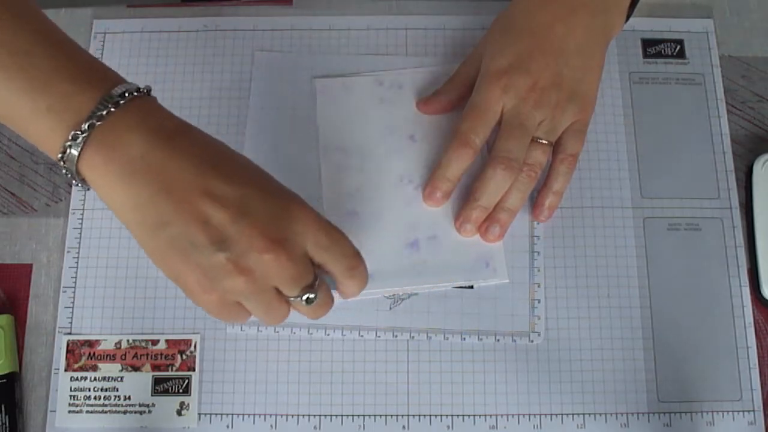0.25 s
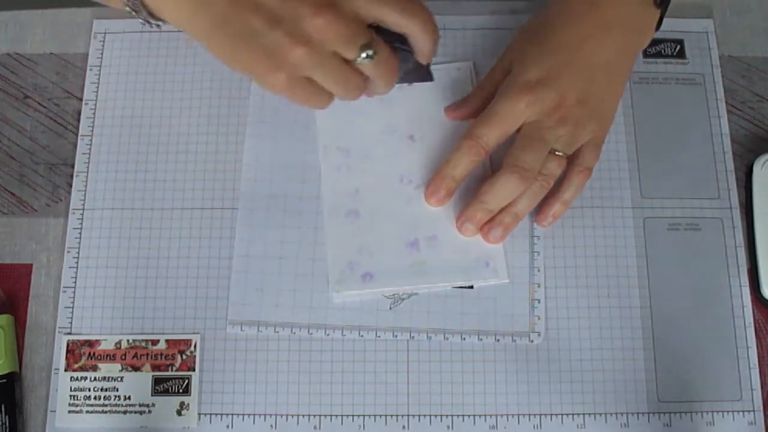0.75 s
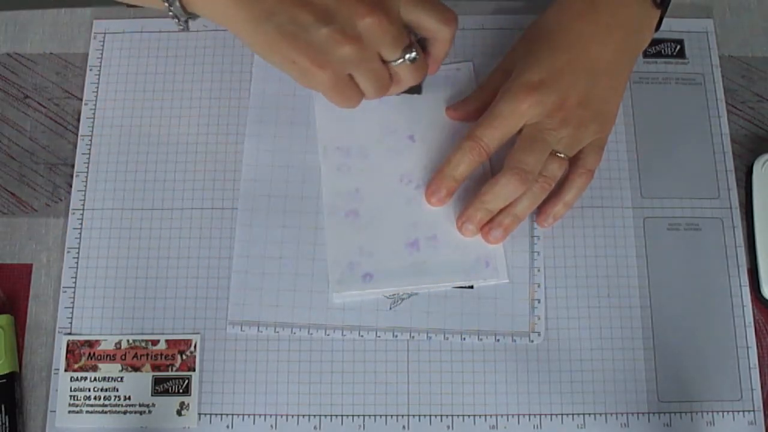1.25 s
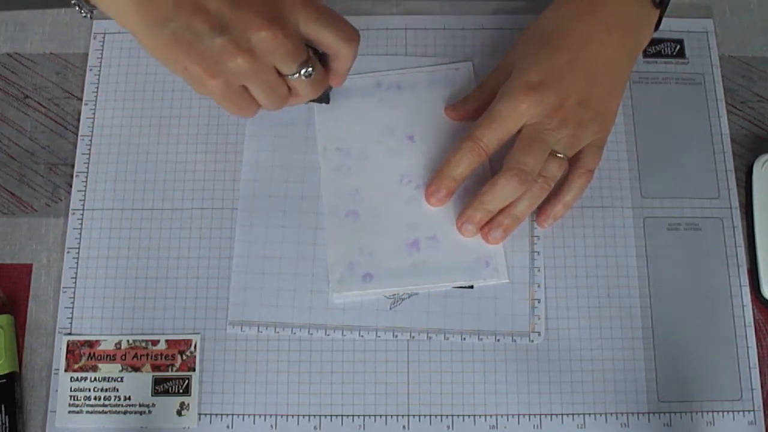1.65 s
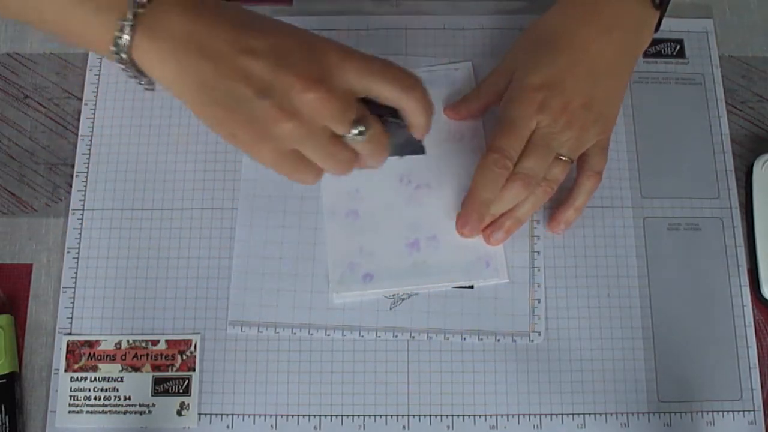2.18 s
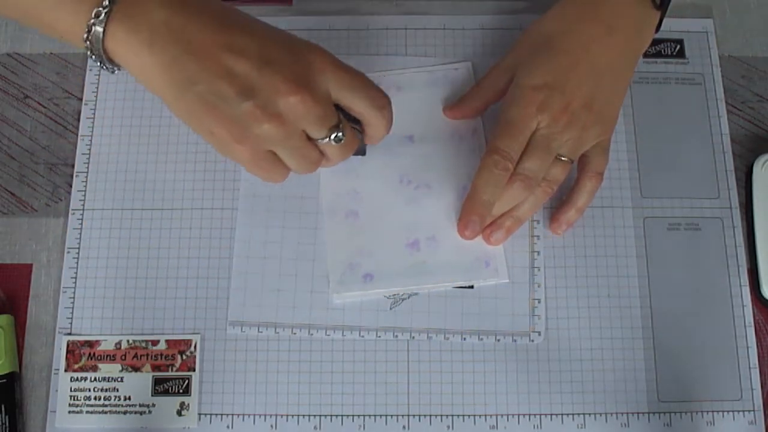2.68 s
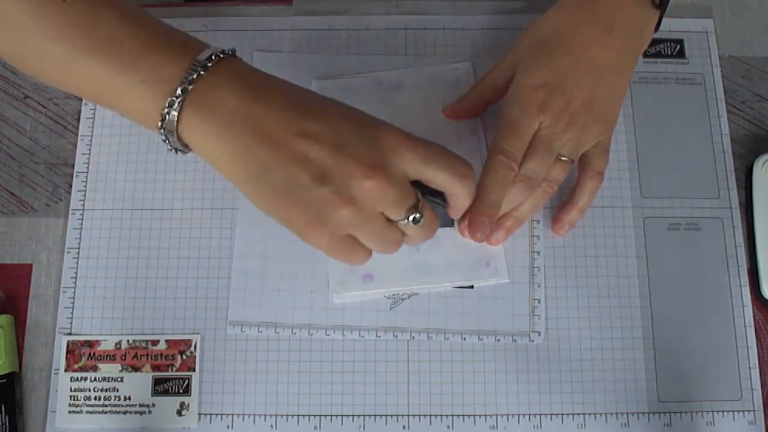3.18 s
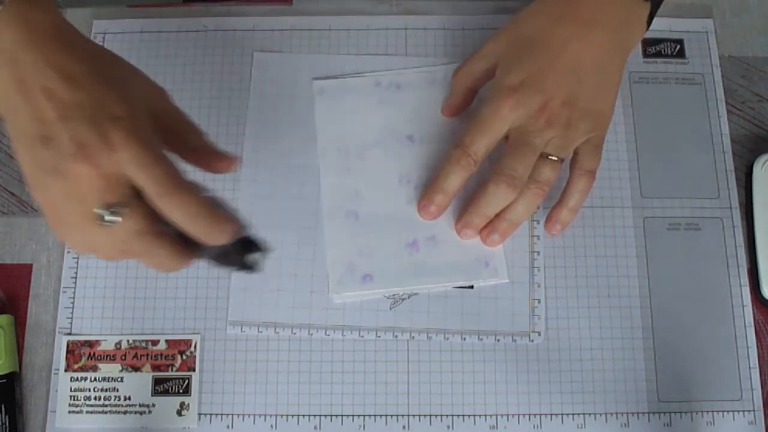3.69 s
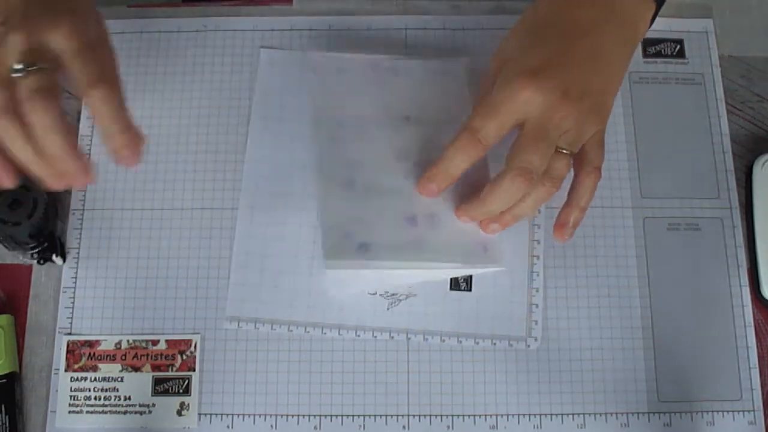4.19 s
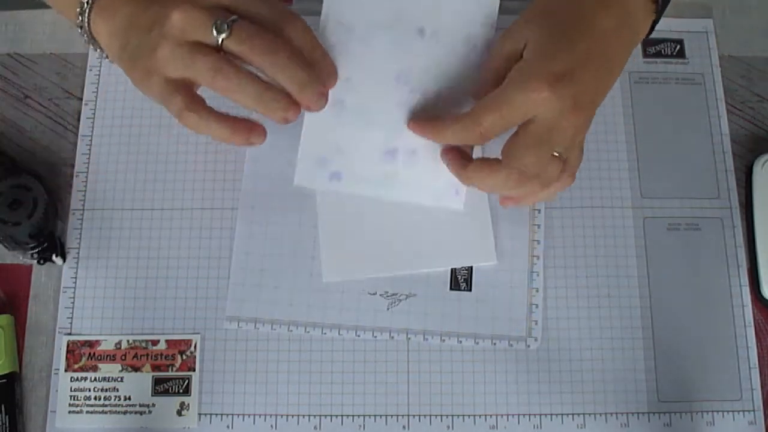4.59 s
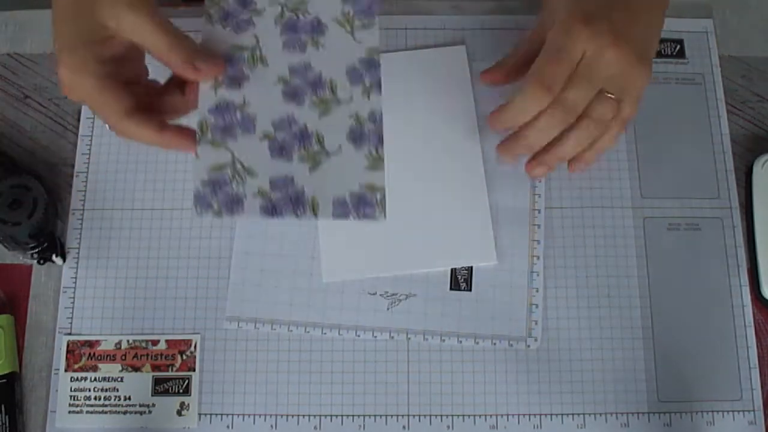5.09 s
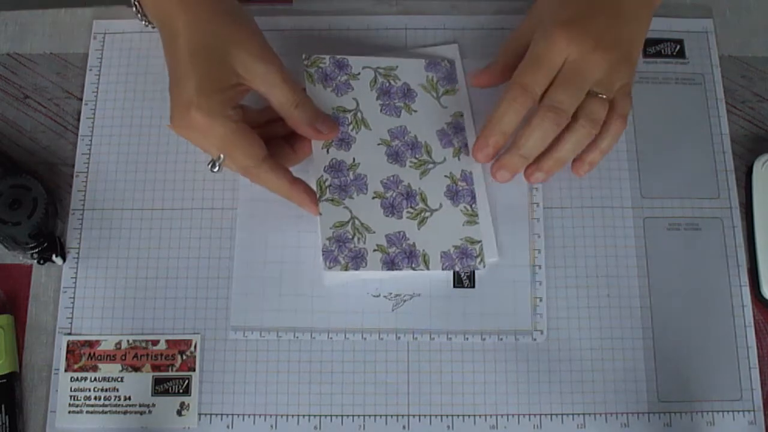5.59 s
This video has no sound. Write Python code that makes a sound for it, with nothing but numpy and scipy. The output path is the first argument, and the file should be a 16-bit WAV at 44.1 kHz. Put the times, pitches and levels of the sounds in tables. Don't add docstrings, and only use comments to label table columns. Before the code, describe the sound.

At a craft table, a nearby microphone picks up four coarse plastic ratcheting strokes, the first already under way. Hands brush the card and the tool taps lightly in the gaps. After the fourth stroke it is set down sharply, knocking, buzzing and bouncing on wood, then sliding briefly. A sheet is lifted and turned with faint rustles and small snaps, leaving quiet hiss with a barely audible fast ticking.

```python
import sys
import numpy as np
from scipy import signal
from scipy.fft import rfft, irfft, next_fast_len
from scipy.io import wavfile
from scipy.ndimage import uniform_filter1d

SR = 44100
rng = np.random.default_rng(int(sys.argv[2]) if len(sys.argv) > 2 else 0)


def volts_from_db(level):
    exponent = np.asarray(level, float) / 20
    return 10 ** exponent


def wav_record(signal):
    frames = np.transpose(np.atleast_2d(signal))
    bounded = np.clip(frames, -1, 1)
    quanta = np.round(bounded * 32767).astype(np.int16)
    wavfile.write(sys.argv[1], SR, quanta)


N = 257959

# f/Hz, level/dB [per Hz]
HISS_SPECTRUM = [(12, -48), (20, -8.5), (75, -8.5), (144, -1), (301, 4.5), (699, 2.5), (757, 2.5), (934, 0),
                 (2110, -3), (2290, -3.5), (4910, -8.5), (7880, -10), (10800, -12.5), (14100, -50),
                 (22000, -120)]
HISS_DB = -54
FRAME_HZ, FRAME_S = 30, .0198
BANDWIDTH_HZ = 11020
# f/Hz, T60/s
ROOM_T60 = [(100, 0.32), (500, 0.28), (2000, 0.34), (5000, 0.32), (8000, 0.33), (11000, 0.32)]
# f/Hz, level/dB
ROOM_COLOUR = [(500, 4), (1500, -1), (3000, 1), (5500, 0), (9000, -2.5)]
LEAD_S = .2
WALL_RING, TAP_WALL_RING = .5, .28

SWELL_DB = 25
# t/s [peak], rise/s, fall/s, rub level/dB, rustle level/dB
HAND_RUBS = [(.42, 0.077, 0.33, -38, -38), (1.01, .012, 0.13, -44.5, -38), (1.068, 0.12, 0.064, -38, -58),
             (1.175, 0.08, 0.012, -37, -42), (2.11, .12, 0.45, -55, -73), (2.375, 0.037, 0.1, -34, -47),
             (2.843, 0.039, 0.03, -35.5, -38), (3.182, 0.05, 0.2, -41, -70), (3.255, .22, .015, -64, -64),
             (3.62, 0.056, 0.078, -44, -44), (3.94, 0.29, .015, -63, -46)]
# t/s [peak], rise/s, fall/s, rub level/dB, rustle level/dB
PAPER_TURNS = [(4.24, .02, 0.27, -40, -47), (4.487, 0.021, 0.13, -43, -49), (4.71, 0.17, .05, -50, -49),
               (4.79, 0.037, 0.018, -40, -42.5), (4.823, 0.019, 0.096, -36, -41),
               (5.072, 0.18, 0.15, -47, -45.5), (5.22, 0.0084, 0.009, -70, -47), (5.3, .1, .18, -56, -70),
               (5.452, .025, 0.35, -64, -49), (5.67, 0.56, 0.15, -55, -56), (5.758, 0.019, .15, -55, -55)]
# t/s [peak], rise/s, fall/s, level/dB, f/Hz [at peak], sag/(Hz/s^2)
ROLLER_SQUEAKS = [
    (.505, .09, .05, -61, 5290, 40000),
    (.582, .06, .035, -56, 4860, 200000),
    (.578, .05, .03, -59, 2430, 100000),
    (.21, .05, .05, -49, 470, 0),
]
# t/s [peak], rise/s, fall/s, level/dB
SWEEP_1 = (.52, .16, .22, -53)
SWEEP_4 = (3.74, .12, .2, -53)
# f/Hz, width/Hz, level/dB
WHINE_1 = [(2420, 240, 3), (5050, 260, 1), (6750, 200, -14), (9000, 136, -9)]
WHINE_4 = [(1910, 200, 3), (3070, 300, -2), (5210, 100, -14)]
# t/s [peak], rise/s, fall/s, level/dB
SLIDE = (4.145, .06, .17, -36)
# f/Hz, width/Hz, level/dB
SKID_MODES = [(1890, 90, 10.5), (2780, 250, -1), (3100, 200, -6), (4010, 130, -2), (4950, 66, 10),
              (7200, 250, -6.5), (10000, 200, -13)]

# f/Hz, level/dB, T60/s
TABLE_MODES = [(122.8, -1, 0.4), (164, -18, 0.1), (204, -3, 0.12), (254, -11, 0.15), (310.5, -4, 0.15),
               (396, 5.5, 0.051), (469, 1, 0.08), (651, -5, 0.12), (856, 6, 0.069), (1330, -16, 0.06)]
# t/s, peak level/dB, f/Hz [of the push]
THUDS = [
    (3.9705, -12.5, 400),
    (4.0427, -14, 420),
    (3.997, -30, 330),
    (4.014, -24, 470),
    (4.0245, -25, 470),
    (4.0665, -25, 430),
    (4.255, -29, 720),
    (4.263, -38, 300),
]
# t/s [peak], rise/s, fall/s, peak level/dB
LIP_CHATTER = (3.969, .0125, .066, -15)
# multiple of slip rate, level/dB
SLIP_ORDERS = [(1, -7), (2, 0), (3, -8), (4, -10), (5, -20)]
CHATTER_HZ, CHATTER_S, LAG_HZ, SETTLE_S = 461, 3.9655, 27, .012

# t/s, peak level/dB,
# ring f/Hz, table thud level/dB, burst/ms
TAPS = [(0.338, -40, 500, -40, 4), (0.5235, -42, 5150, -55, 3.2), (0.597, -35.5, 2640, -66, 3.6),
        (0.5985, -41, 4300, -70, 3), (0.66, -39, 2970, -68, 4.3), (0.807, -36, 2540, -58, 7.8),
        (1.006, -34, 2710, -70, 3.4), (1.0152, -33, 2720, -64, 5.1), (1.0212, -30.5, 3100, -57, 7.5),
        (1.035, -28, 2600, -49, 3.1), (1.128, -30, 2700, -66, 1.7), (1.1326, -28.5, 1760, -65, 3.4),
        (1.885, -41, 4300, -70, 2.3), (1.9319, -26, 7000, -60, 3.4), (1.9763, -45, 4200, -61, 1.2),
        (2.1906, -45, 1690, -56, 5), (2.2942, -33.5, 2770, -60, 1.8), (2.363, -27.5, 2930, -28, 3.5),
        (2.409, -48, 5200, -45, 2.4), (2.8363, -33, 2140, -63, 2.3), (2.9838, -42.5, 2040, -56, 2.6),
        (3.132, -35, 1500, -36, 4), (3.134, -36, 2100, -60, 3), (3.1555, -25.5, 1500, -52, 2.2),
        (3.2166, -38, 1660, -68, 3.4), (3.228, -41, 1720, -57, 2.3),
        (3.562, -42, 500, -42, 4), (3.592, -36, 1400, -50, 3), (3.704, -37.5, 1910, -64, 2.5),
          (3.7218, -37, 1900, -66, 5.3), (3.78, -34, 3030, -66, 2.7), (3.8406, -36.5, 9100, -67, 1.8),
          (3.8717, -49, 7550, -63, 2.5), (3.92, -44, 4500, -55, 3.2), (3.9675, -22, 7400, -60, 7),
          (3.9682, -19.5, 1430, -51, 7.6), (4.0445, -29, 2750, -30, 3.9), (4.057, -30, 1420, -60, 6),
          (4.053, -24, 3000, -34, 2.5), (4.1022, -27, 3950, -52, 1.4), (4.1273, -34, 4920, -60, 2.4),
          (4.1868, -39, 1900, -62, 3.6), (4.2525, -39, 720, -43, 3), (4.691, -46, 1210, -60, 2.5),
          (4.7813, -48, 1640, -48.5, 3.7), (4.819, -42, 1040, -65, 2.6), (4.8326, -38, 1300, -56, 4.8),
          (4.869, -41.5, 6400, -46, 4.5), (5.2196, -39, 5600, -62, 1.3), (5.444, -36.5, 6500, -55, 6.3),
          (5.509, -46, 9500, -63, 3)]
# f/Hz, level/dB [per Hz]
TAP_SPECTRUM = [(300, -30), (1000, -2), (2500, -0.5), (5000, -5), (10800, -14.5)]
TAP_REACH, DULL_HZ = 2.6, 2200

# f/Hz, level/dB [per Hz]
CRACK_SPECTRUM = [(100, -28), (450, -9), (850, -6), (1300, -10), (2100, -11.5), (2850, 4), (3400, -3),
                  (4700, -6.5), (6400, -1.5), (8000, -6), (10800, -10), (14000, -64)]
# f/Hz, width/Hz, level/dB
GRIP_1 = [(1320, 150, 5), (1520, 220, 11), (2350, 380, 4), (2930, 200, -2), (3790, 400, 1), (4500, 200, -5),
          (5600, 830, -4.5)]
GRIP_2 = [(1460, 170, 5), (1790, 250, 7), (2260, 140, 4.5), (2620, 120, 0), (4720, 2200, -1),
          (6360, 280, -9), (10000, 650, -13)]
GRIP_3 = [(1730, 230, -1), (2270, 250, -3), (2770, 57, -14), (4200, 120, 0), (4580, 92, -4),
          (4950, 240, -1), (10200, 770, -26)]
GRIP_4 = [(1550, 670, 11), (2000, 150, -19), (2770, 78, 6), (4220, 1300, 1.5), (4860, 210, 1),
          (6230, 250, 6.5), (9800, 400, -20)]
# t/s, level/dB, brightness/dB, low ring f/Hz, high ring f/Hz
TEETH_1 = [(0.0062, -21, -1, 1590, 4300), (0.0185, -22.5, -5, 1530, 4370), (0.0271, -20.0, -1, 1580, 4270),
           (0.0389, -20, 0, 1490, 5400), (0.0466, -20, -2.5, 1590, 5600), (0.0605, -21.0, -1, 1540, 4340),
           (0.07, -23, 7, 1660, 3940), (0.084, -23, -2, 1600, 6040), (0.0967, -22.5, -7, 1320, 3820),
           (0.1093, -22.5, 0, 1670, 4520), (0.1249, -21, 1, 1530, 4700), (0.1404, -23.5, 1, 1480, 3800),
           (0.154, -20, 8.5, 1600, 3900), (0.1677, -18.5, -5, 1520, 3870),
           (0.1848, -20.5, -7.5, 1450, 3660), (0.206, -19.5, -7.0, 1510, 4440),
           (0.2233, -21, 4, 1550, 3970), (0.2453, -21.5, -1, 1360, 3820)]
TEETH_2 = [(1.1886, -20.5, 1, 1400, 4840), (1.2073, -19, -5, 1880, 6200), (1.2227, -20.5, 1, 2600, 6900),
           (1.2319, -26, -2, 2490, 6100), (1.2436, -22.5, -5, 1380, 3800), (1.2511, -25, 4, 1790, 4910),
           (1.2626, -22.5, 1.5, 1740, 6600), (1.273, -25.5, 1.5, 1870, 4810),
           (1.2829, -22.5, 1, 1830, 4830), (1.296, -25, 11, 2350, 4380), (1.3045, -20, 0, 1720, 4650),
           (1.314, -22.5, 1, 2350, 4250), (1.3251, -20, 1, 2450, 4710), (1.3343, -24.5, 3, 2900, 6360),
           (1.3465, -20, 0, 2740, 4790), (1.3569, -22, 4, 1570, 5020), (1.3648, -21, 4, 2330, 5100),
           (1.376, -23.5, -1, 1910, 4410), (1.3853, -22, 7, 2360, 4740), (1.396, -24.5, 2.5, 1660, 4740),
           (1.4079, -19.5, -2, 2500, 4350), (1.4214, -20.5, -1, 2720, 5170), (1.4327, -23, -3, 2800, 4600),
           (1.444, -24.0, 0, 1590, 6570), (1.4557, -18, -1.5, 1670, 4520), (1.4677, -22, -4, 1730, 4580),
           (1.4805, -24.0, 4, 1700, 4650), (1.4935, -27, 5, 1780, 4760), (1.505, -21.5, 1.0, 1580, 4580),
           (1.5176, -21.5, -4, 1730, 5900), (1.5327, -24, 0.5, 1880, 5050), (1.5503, -20.5, -3, 1890, 4700),
           (1.5684, -22, -2.0, 1660, 4730), (1.585, -23, 2.0, 1650, 4340), (1.6064, -23, -3, 1940, 4580)]
TEETH_3 = [(2.4311, -22.5, 3.5, 1770, 5360), (2.445, -22, 2, 1670, 4850), (2.4567, -20, 2, 1960, 5230),
           (2.4694, -23, 5, 2000, 6040), (2.4754, -22.5, 3, 2000, 4230), (2.4847, -24, 12, 2000, 5220),
           (2.4942, -22.5, 5, 1600, 4140), (2.502, -25.5, 4, 2700, 4720), (2.5106, -22.5, 4, 1550, 5400),
           (2.5181, -23, 3, 2970, 6200), (2.5242, -22.5, 9, 2730, 4100), (2.5317, -22.0, 0, 1720, 4200),
           (2.5407, -23.5, 2, 2780, 3950), (2.5498, -22.5, 2, 1560, 5170), (2.5572, -21, -1, 1570, 3950),
           (2.565, -25.5, 6, 1790, 4530), (2.573, -22, -2, 1640, 4870), (2.5829, -21, 2, 1550, 4500),
           (2.593, -21, -7, 1790, 5160), (2.6002, -20, -1, 1820, 5200), (2.6108, -25, -6, 1740, 4400),
           (2.62, -20.5, -4, 1570, 4600), (2.6322, -23, -5, 1840, 6060)]
TEETH_4 = [(3.27, -20.5, -4, 1730, 3960), (3.2906, -20.5, -4.0, 1970, 3750), (3.3074, -23.5, 1, 2070, 3430),
           (3.3174, -22, -0.5, 2100, 6000), (3.3258, -25.5, 8.0, 2790, 5100),
           (3.3336, -22.5, 5, 1890, 6000), (3.3435, -24.5, 5, 1530, 6050), (3.3527, -24, 13, 2700, 6160),
           (3.362, -21.5, 0, 1660, 6300), (3.37, -24.5, 4, 2680, 6400), (3.3762, -26, 1.5, 2240, 4650),
           (3.385, -20, -5, 1460, 4600), (3.3927, -22, 1, 1510, 4600), (3.401, -20, -2, 2100, 3960),
           (3.4077, -21, -2, 1700, 5100), (3.4185, -26.5, 3, 1510, 4840), (3.4262, -23.0, 4, 1670, 5030),
           (3.436, -22.5, 4, 1830, 4970), (3.4454, -24, 5, 2840, 5000), (3.4561, -20.5, -3.5, 1890, 4030),
           (3.4696, -21.0, -2, 1670, 6310), (3.4812, -23.5, -1, 2000, 5800), (3.4935, -25, 7.5, 1870, 4620),
           (3.5054, -19, -2, 2030, 5600), (3.5262, -22.5, -0.5, 1910, 5800)]
# t/s, level/dB, brightness/dB, low ring f/Hz, high ring f/Hz
TEAR_1 = [(.325, -21, -1, 1610, 3830), (.339, -23, -3, 1910, 4350), (0.35, -24, 0, 1650, 5600),
          (0.353, -26.5, -3, 1550, 2860)]
TEAR_2 = [(1.663, -21, -3.5, 1930, 5870), (1.674, -40, -8, 1780, 4240), (1.691, -22, -2, 1800, 4600),
          (1.7874, -23.5, 2, 1880, 4300), (1.941, -22, 3, 1870, 8000)]
TEAR_3 = [(2.716, -20.5, -1, 1750, 4500), (2.729, -32, -2.3, 2000, 4300)]
# level/dB of the card below the case, level/dB of the low ring
VOICING = [
    (-11, 5),
    (-10.5, -5.5),
    (-6.5, -4),
    (-8, -2),
]
TOOTH_RISE_S, TOOTH_FALL_S, TOOTH_LEAD_S = .0017, .003, .0008
CASE_CUT_HZ, SPLIT_HZ = 1050, 3100
HIGH_RING_DB = -7.5


def rms_one(x):
    return x / np.sqrt(np.mean(x ** 2) + 1e-20)


def at_hz(points, hz):
    points = np.array(points)
    return np.interp(np.log(hz + 1), np.log(points[:, 0]), points[:, 1])


def colour(x, spectrum):
    size = next_fast_len(len(x) + 4096)
    gain = rms_one(volts_from_db(at_hz(spectrum, np.fft.rfftfreq(size, 1 / SR))))
    return irfft(rfft(x, size) * gain, size)[:len(x)]


def resonate(x, hz, width_hz):
    r = np.exp(-np.pi * width_hz / SR)
    zeros = np.array([1, 0, -1]) * (1 - r * r) / 2
    return signal.lfilter(zeros, [1, -2 * r * np.cos(2 * np.pi * hz / SR), r * r], x)


def band(x, low_hz, high_hz):
    return signal.sosfilt(signal.butter(2, [low_hz, high_hz], "band", fs=SR, output="sos"), x)


def grit(count, spread_db):
    return rms_one(rng.standard_normal(count) * volts_from_db(spread_db * rng.standard_normal(count)))


def swell(peak_s, rise_s, fall_s, db, bend):
    since = np.arange(N) / SR - peak_s
    return volts_from_db(db - SWELL_DB * (np.abs(since) / np.where(since < 0, rise_s, fall_s)) ** bend)


def add(out, x, s):
    i = round(s * SR)
    x = x[max(-i, 0):N - i]
    out[max(i, 0):max(i, 0) + len(x)] += x


def strike(burst, body, db, wall_ring):
    click = np.zeros(len(burst))
    click[np.argmax(np.abs(burst))] = rng.choice([-1, 1])
    near, far = body(burst, 0.95), body(click, wall_ring)
    near = near * volts_from_db(db) / np.sqrt(np.max(uniform_filter1d(near ** 2, size=150)))
    return near, far * np.sqrt(np.sum(near ** 2) / np.sum(far ** 2))


def microphone_hiss():
    return volts_from_db(HISS_DB) * rms_one(colour(rng.standard_normal(N), HISS_SPECTRUM))


def frame_tick():
    phase = (np.arange(N) / SR - FRAME_S) * FRAME_HZ % 1
    gate = np.exp(-phase / .07) + .5 * np.exp(-((phase - .5) % 1) / .04)
    return volts_from_db(-55) * gate * rms_one(band(rng.standard_normal(N), 4300, 6500))


def room(x):
    t = np.arange(int(.7 * SR)) / SR
    edges = np.geomspace(80, 16000, num=25)
    noise = rng.standard_normal(len(t))
    tail = 0
    for low, high in zip(edges, edges[1:]):
        tail = tail + band(noise, low, high) * volts_from_db(-60 * t / at_hz(ROOM_T60, np.sqrt(low * high)))
    tail = colour(tail, ROOM_COLOUR) * np.clip((t - .002) / 0.004, 0, 1)
    return signal.fftconvolve(x, tail / np.sqrt(np.sum(tail ** 2)))[:len(x)]


def rustle():
    gestures = HAND_RUBS + PAPER_TURNS
    low = sum(swell(s, rise, fall, db, bend=0.95) for s, rise, fall, db, _ in gestures)
    crisp = sum(swell(s, rise, fall, db, bend=0.85) for s, rise, fall, _, db in gestures)
    rub = band(grit(N, spread_db=3), 600, 1900)
    crackle = band(grit(N, spread_db=4), 2600, 9500)
    return low * rms_one(rub) + crisp * rms_one(crackle)


def squeaks():
    t = np.arange(N) / SR
    flutter = 1 + .6 * rms_one(band(rng.standard_normal(N), 20, 90))
    whistles = 0
    for s, rise, fall, db, hz, sag in ROLLER_SQUEAKS:
        phase = 2 * np.pi * (hz * t - sag * (t - s) ** 3 / 3)
        whistles = whistles + swell(s, rise, fall, db + 3, bend=2) * np.sin(phase)
    return flutter * whistles


def skid(stroke, modes, broad_db, glide):
    rub = grit(N, spread_db=3)
    rings = sum(volts_from_db(db) * resonate(rub, hz, width) for hz, width, db in modes)
    t = np.arange(N) / SR
    rings = np.interp(t + glide * (t - stroke[0]) ** 2 / 2, t, rings)
    gain = swell(*stroke, bend=2.25)
    sound = gain * (rings + volts_from_db(broad_db) * band(rub, 620, 4100))
    return sound * np.sqrt(np.sum(gain ** 2) / np.sum(sound ** 2))


def rumble(runner):
    pressure = np.sqrt(uniform_filter1d(runner ** 2, size=4000) + 1e-12)
    return volts_from_db(-37) * pressure * rms_one(resonate(rng.standard_normal(N), 122, width_hz=13))


def table(push):
    out = 0
    for hz, db, t60 in TABLE_MODES:
        r, w = volts_from_db(-60 / (t60 * SR)), 2 * np.pi * hz / SR
        out = out + signal.lfilter([0, volts_from_db(db) * np.sin(w)], [1, -2 * r * np.cos(w), r * r], push + 1e-18)
    return out


def landing_thuds():
    out, t = np.zeros(N), np.arange(-300, 300) / SR
    for s, db, hz in THUDS:
        pulse = np.cos(2 * np.pi * hz * t) * np.exp(-(1.9 * hz * t) ** 2)
        add(out, volts_from_db(db) * pulse, s - 300 / SR)
    return out


def lip_buzz():
    since = np.maximum(np.arange(N) / SR - CHATTER_S, -.05)
    lag = LAG_HZ * SETTLE_S * (np.exp(-since / SETTLE_S) - 1)
    phase = 2 * np.pi * (CHATTER_HZ * since + lag)
    buzz = sum(volts_from_db(db) * np.cos(np.round(k) * phase) for k, db in SLIP_ORDERS)
    wander = rms_one(band(rng.standard_normal(N), 30, 160))
    uneven = volts_from_db(1.5 * wander * np.clip((since - .01) / .02, 0, 1))
    return -swell(*LIP_CHATTER, bend=1.3) * uneven * buzz / np.max(buzz)


def taps():
    near, far, push, t = np.zeros(N), np.zeros(N), np.zeros(N), np.arange(1500) / SR
    for s, db, hz, thud_db, ms in TAPS:
        hit = grit(len(t), spread_db=4.0) * np.exp(-t * 1000 / ms) * np.minimum(t / 0.00099, 1)
        top_hz = TAP_REACH * hz if hz < DULL_HZ else 15000

        def body(v, ring):
            broad = rms_one(band(colour(v, TAP_SPECTRUM), 150, top_hz))
            return broad + ring * volts_from_db(-1.5) * rms_one(resonate(v, hz, width_hz=160))

        direct, click = strike(hit, body, db - 3.5, TAP_WALL_RING)
        add(near, direct, s - .001)
        add(far, click, s - .001)
        add(push, volts_from_db(thud_db - 7) * np.hanning(110), s + .003)
    return near, far, push


def ratchet(teeth, grip, voicing, ring_db, scatter_db):
    near, far, t = np.zeros(N), np.zeros((3, N)), np.arange(-300, 900) / SR
    shape = np.exp(-(np.abs(t) / np.where(t < 0, TOOTH_RISE_S, TOOTH_FALL_S)) ** 2)
    thin = signal.butter(3, CASE_CUT_HZ, "high", fs=SR, output="sos")
    split = signal.butter(4, SPLIT_HZ, fs=SR, output="sos")
    card_db, low_ring_db = voicing
    for n, (s, db, bright_db, low_hz, high_hz) in enumerate(teeth):
        strengths = volts_from_db(ring_db + scatter_db * rng.standard_normal(len(grip)))
        shifts = 1 + .025 * rng.standard_normal(len(grip))

        def case(hit, ring):
            body = colour(hit, CRACK_SPECTRUM)
            for strength, shift, (hz, width, mode_db) in zip(strengths, shifts, grip):
                body = body + strength * volts_from_db(mode_db) * resonate(hit, shift * hz, width)
            body = rms_one(body)
            body = body + ring * volts_from_db(low_ring_db) * rms_one(resonate(hit, low_hz, width_hz=147))
            body = body + ring * volts_from_db(HIGH_RING_DB) * rms_one(resonate(hit, high_hz, width_hz=90))
            low = signal.sosfiltfilt(split, body)
            high = body - low
            upper = signal.sosfiltfilt(thin, low)
            low = upper + volts_from_db(card_db) * (low - upper)
            return low / np.std(band(low, 1100, 2400)) + volts_from_db(bright_db + .5) * rms_one(high)

        direct, click = strike(shape * grit(len(t), spread_db=4.0), case, db, WALL_RING)
        start = s - TOOTH_LEAD_S - 300 / SR
        add(near, direct, start)
        add(far[n % 3], click, start)
    return np.vstack([near, far])


def scene():
    teeth = (TEETH_1 + TEAR_1, TEETH_2 + TEAR_2, TEETH_3 + TEAR_3, TEETH_4)
    strokes = zip(teeth, (GRIP_1, GRIP_2, GRIP_3, GRIP_4), VOICING)
    runner, *feeds = sum(ratchet(*stroke, ring_db=6.5, scatter_db=-4.0) for stroke in strokes)
    tap, tap_feed, push = taps()
    thud, buzz = landing_thuds(), lip_buzz()
    slides = skid(SLIDE, SKID_MODES, broad_db=-5, glide=-0.08) + squeaks()
    slides = slides + skid(SWEEP_1, WHINE_1, broad_db=-19, glide=-0.41)
    slides = slides + skid(SWEEP_4, WHINE_4, broad_db=-14, glide=0)
    wood = volts_from_db(-39.5) * table(push) + volts_from_db(-51.0) * table(thud) + volts_from_db(-47.5) * table(runner)
    lead = round(LEAD_S * SR)
    wet = volts_from_db(-2.5) * sum(room(np.concatenate([feed[:lead][::-1], feed]))[lead:] for feed in feeds)
    wet = wet + room(volts_from_db(-3.5) * tap_feed + volts_from_db(-7.0) * (thud + wood) + volts_from_db(-8.5) * buzz)
    mix = runner + tap + thud + buzz + wood + wet + slides + rumble(runner) + volts_from_db(-8.0) * rustle()
    return mix[None]


def band_limit(x):
    return signal.sosfilt(signal.butter(12, 13900, fs=SR, output="sos"), x)


def record(dry):
    bass_cut = signal.butter(5, 112, "high", fs=SR, output="sos")
    x = signal.sosfiltfilt(bass_cut, dry, padtype="even")
    x = x + microphone_hiss() + frame_tick()
    x = x * np.minimum(np.arange(N) / SR / .002, 1)
    leak = volts_from_db(-21.5) * x
    for _ in range(3):
        leak = band(leak, 12950, 13500)
    cut = signal.sosfilt(signal.ellip(10, .5, 45, BANDWIDTH_HZ, fs=SR, output="sos"), x)
    cut = signal.sosfilt(signal.cheby2(10, 30, 12300, fs=SR, output="sos"), cut)
    return band_limit(cut + leak)


dry = scene()
out = record(dry)
wav_record(out)
```